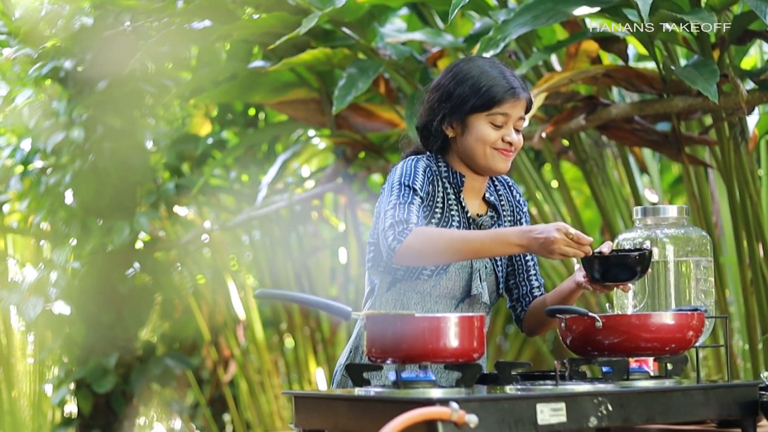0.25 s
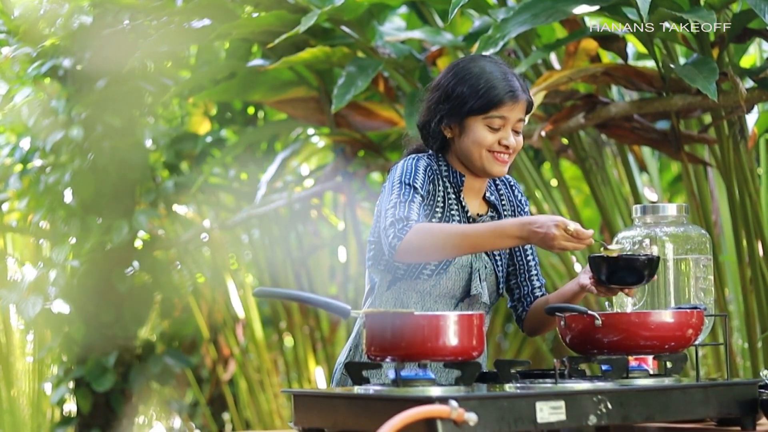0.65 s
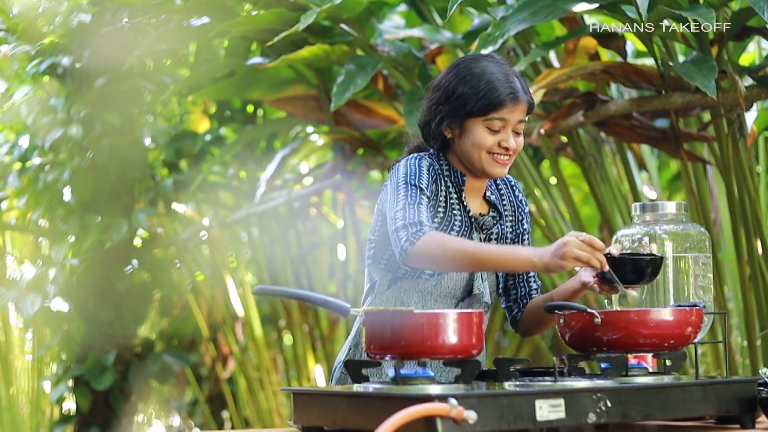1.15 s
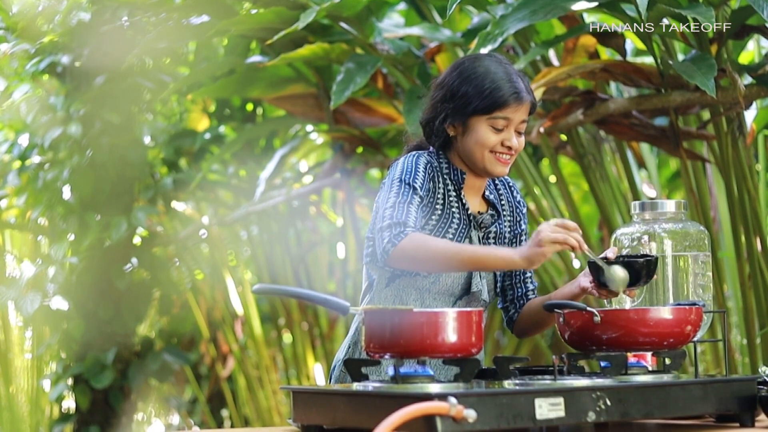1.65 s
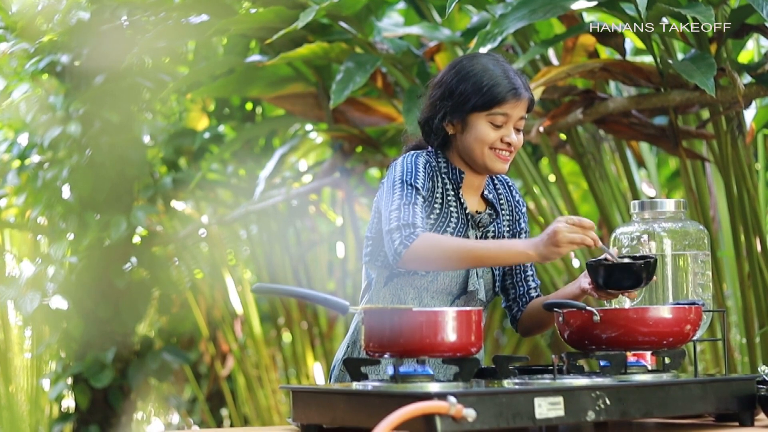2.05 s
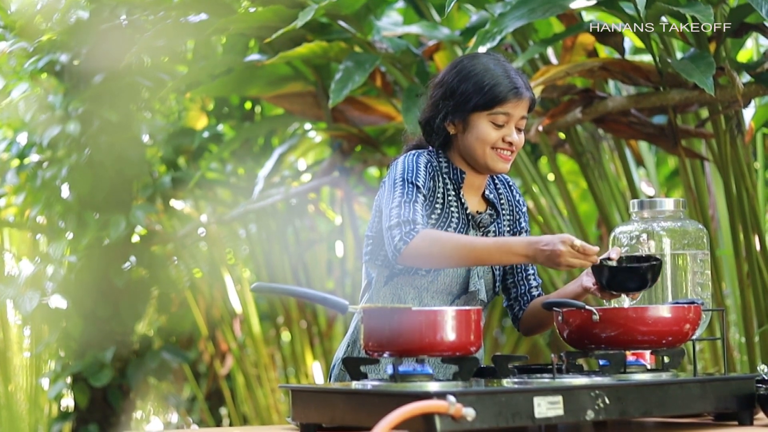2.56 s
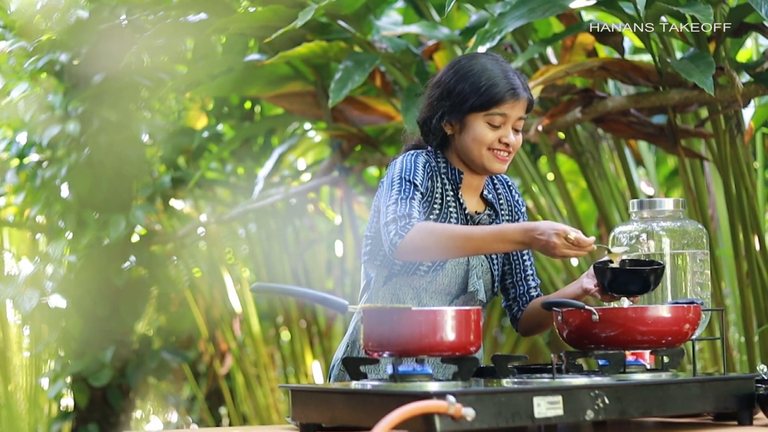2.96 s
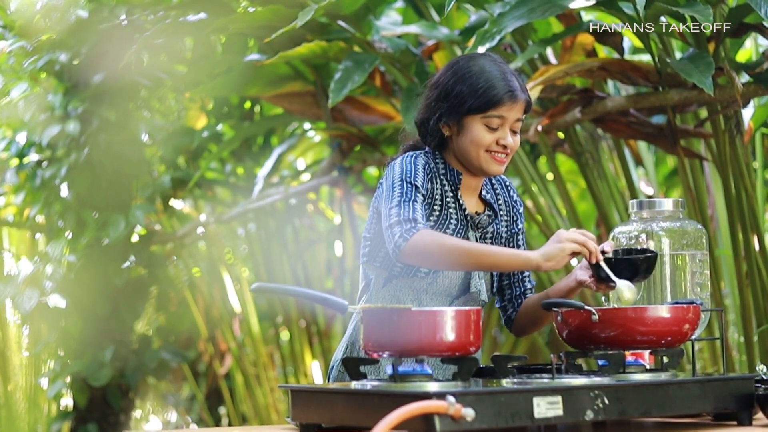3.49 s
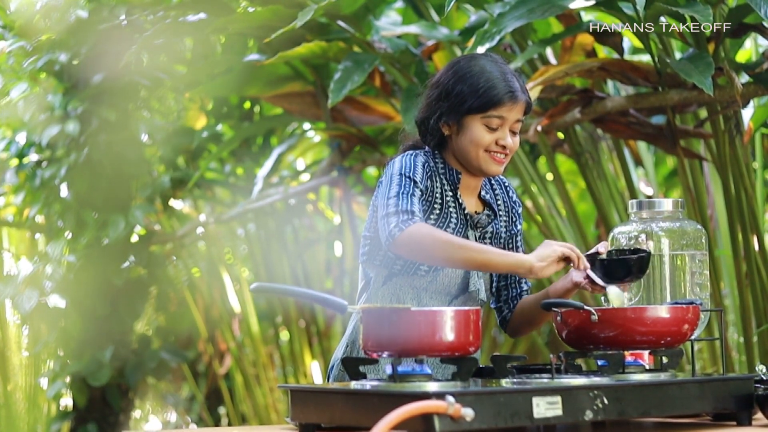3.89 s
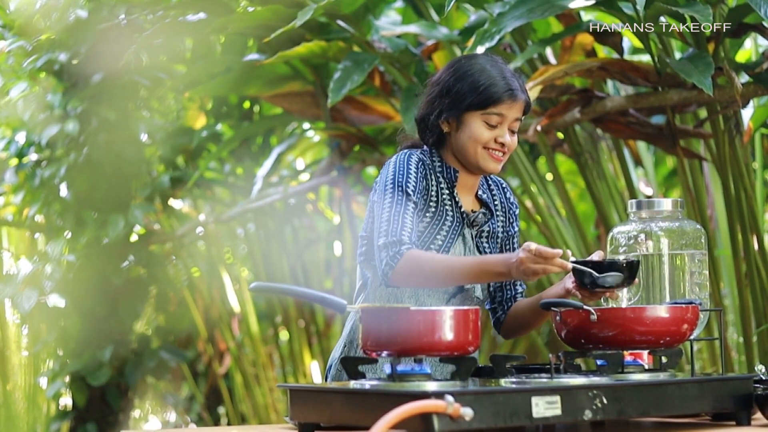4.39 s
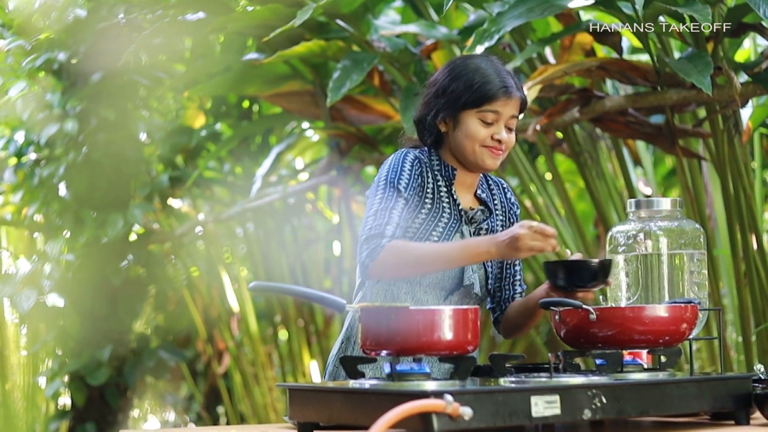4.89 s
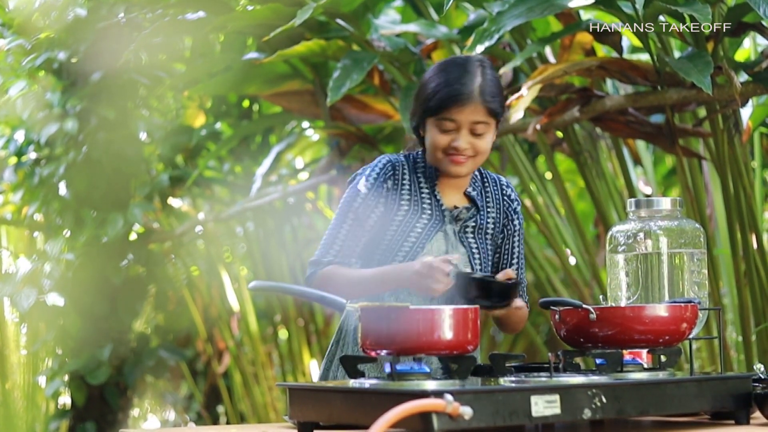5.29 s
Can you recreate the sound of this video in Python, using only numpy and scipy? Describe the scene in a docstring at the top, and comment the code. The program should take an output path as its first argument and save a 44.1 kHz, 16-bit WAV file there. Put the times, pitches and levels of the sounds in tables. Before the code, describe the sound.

Rising bird whistles echo among trees above a pulsing insect buzz, as someone close by knocks a metal spoon against a bowl.

```python
"""An insect already buzzes as we start: rasping noise on a rising tone, about once a second, over soft air.
Close by, a steel spoon knocks a small bowl: cracks of noise and decaying modes; later it bounces and slides,
then rattles. A koel calls three times from plantation trees: gliding sines smeared by echoes from the trunks.
Behind them are banded-noise chirrs, soft low bumps and ticks, sine peeps of distant birds, and shaped noise
for the open air, which alone differs between the two channels."""
import sys
import numpy as np
from scipy import signal
from scipy.fft import rfft, irfft, next_fast_len
from scipy.io import wavfile
from scipy.ndimage import uniform_filter1d

SR = 44100
rng = np.random.default_rng(int(sys.argv[2]) if len(sys.argv) > 2 else 0)


def dump(signal):
    """Clip the signal to [-1, 1] and save it as 16-bit WAV at the path in sys.argv[1]."""
    limited = np.clip(np.atleast_2d(signal).T, -1, 1)
    pcm = np.round(limited * 32767).astype(np.int16)
    wavfile.write(sys.argv[1], SR, pcm)


N = 244269
TIME = np.arange(N) / SR  # s

# Koel in the trees; each whistle: (t/s from the call's start, f/Hz before the call's shift, relative level/dB)
# A level note with a glide at each end
KOEL_FIRST_NOTE = [(0, 1513, -66), (.025, 1772, -51), (.045, 1839, -44.5), (.13, 1852, -38),
                   (.16, 1820, -37), (.2, 1524, -49.5)]
# A higher note that breaks and falls
KOEL_SECOND_NOTE = [(.325, 1600, -59), (.355, 1880, -50), (.38, 2085, -34), (.4, 2075, -38),
                    (.415, 1915, -35.5), (.484, 1880, -39.5), (.514, 1560, -45.5), (.55, 1345, -44)]
# A last downward slur
KOEL_SLUR = [(0.568, 1896, -36), (.585, 1802, -44.5), (.612, 1697, -39), (.642, 1550, -39),
             (0.659, 1494, -60)]
# Each call is higher and louder than the last:
# (start t/s, time stretch/1, pitch shift/semitones, first note level/dB, second note and slur level/dB)
KOEL_CALLS = [(.594, .965, -.45, -4.8, -2), (2.629, 1.0, -.03, -1.8, -1), (4.543, 1.0, .33, 4.2, 4.2)]

# Buzzing phrases of the near insect: (start t/s, length t/s, relative level/dB)
BUZZ_PHRASES = [(-.04, 0.95, -65), (0.959, 0.86, -62.5), (1.979, 0.78, -62.5), (2.977, 0.75, -62),
                (3.989, 0.827, -62.5), (4.962, .88, -60.5)]
# Course of one buzzing phrase: (t/s from its start, f/Hz, relative level/dB)
BUZZ_COURSE = [(0, 6020, -6), (0.059, 6150, -2.5), (0.129, 6260, -2), (0.379, 6215, 0), (0.52, 6340, -1),
               (.95, 6380, -6.5)]

# Ringing modes of the close spoon: (nominal f/Hz, relative level/dB, t60/s at ring length 1)
SPOON_MODES = [(883, -7, .15), (2245, -1, 0.1), (4005, -1.5, 0.085), (6122, -10, 0.15), (8590, -7.5, 0.068),
               (11000, -20, 0.041), (14480, -17, .04)]
# Ringing modes of the close bowl: (nominal f/Hz, relative level/dB, t60/s at ring length 1)
BOWL_MODES = [(685, -9, 0.012), (1186, -9.5, 0.039), (2043, -7.5, 0.044), (2620, -1, 0.036),
              (2770, -9, 0.06), (3373, -11, 0.052), (3870, -16, 0.058), (4145, -15, 0.13),
              (4330, -2.5, 0.036), (4690, -4.5, 0.039), (6640, -9, 0.039), (8440, -16.5, 0.084),
              (9560, -11.5, 0.032), (10520, -8.5, 0.032), (11380, -11.5, 0.042), (13620, -17, 0.033)]
# Spoon meets bowl: (t/s, spoon ring level/dB, bowl ring level/dB, contact crack level/dB,
# f/Hz favoured by the point of contact, ring length/1 as a multiple of t60)
KNOCKS = [(0.211, -38.5, -39.5, -34, 2340, 1.05), (.2632, -48.5, -46.5, -44, 2300, 0.68),
          (.345, -56.5, -56, -61, 2300, .6), (2.329, -41.5, -26.5, -32.5, 4750, 0.73),
          (5.1535, -39, -27.5, -32.5, 4440, 0.69), (5.2007, -27, -21.5, -22.5, 2498, 0.64),
          (5.2838, -40, -45, -39, 4030, 0.81)]
# One bounce: (spoon ring level/dB, bowl ring level/dB, crack level/dB, favoured f/Hz, ring length/1)
BOUNCE = (-32.5, -31.5, -36, 3300, 0.62)
# One rattle touch: (spoon ring level/dB, bowl ring level/dB, crack level/dB, favoured f/Hz, ring length/1)
RATTLE = (-56.5, -55, -59, 4000, 0.5)
# The spoon sliding over the bowl: (t/s, level/dB)
SLIDE = [(5.19, -90), (5.225, -74.5), (5.26, -63), (5.309, -46), (5.37, -61.5), (5.54, -58)]
BOUNCE_GAP_S, BOUNCE_SHRINK = .012, .72  # first gap; each gap as a share of the one before
RATTLE_FROM_S, RATTLE_GAP_S = 5.31, .09
TOUCH_S, TOUCH_DB = 0.99, -37  # a soft touch that rings the spoon's lowest mode; level before the mode's own

# Small dry ticks: (t/s, level/dB, centre f/Hz)
TICKS = [(1.768, -44.5, 1590), (2.074, -46, 1326), (5.051, -36.5, 11750)]
TICK_WIDTH, TICK_CYCLES = 0.88, 41  # band width as a share of the centre; cycles to fall 60 dB

# Thin peeps of distant birds: (start t/s, first f/Hz, level/dB before the echoes)
PEEPS = [(.505, 2164, -61), (.68, 2175, -59), (0.684, 2723, -66), (1.616, 2940, -66.5),
         (1.795, 2969, -65.5)]
PEEP_S, PEEP_FALL = 0.0435, 0.067  # length; share by which the pitch falls

# Two insects further off, each at a steady pace.
# The higher chirr: (first middle t/s, period t/s, length t/s, centre f/Hz, width f/Hz, level/dB)
HIGH_CHIRR = (.32, .72, .28, 10080, 600, -79)
# The other chirr: (first middle t/s, period t/s, length t/s, centre f/Hz, width f/Hz, level/dB)
MIDDLE_CHIRR = (2.97, .985, .5, 6560, 270, -72)
# A lower, occasional chirr: (middle t/s, length t/s, level/dB)
LOW_CHIRRS = [(1.5, .4, -72), (1.84, 0.243, -70), (3.88, .5, -70.5)]
LOW_CHIRR_HZ, LOW_CHIRR_WIDTH_HZ = 3878, 600

# Soft low bumps: (middle t/s, length t/s, level/dB)
BUMPS = [(.027, .025, -48), (.57, .15, -56), (.8, .14, -59), (1.75, .08, -63), (4.96, 0.1226, -56)]
BUMP_HZ, BUMP_WIDTH_HZ = 150, 80

# Spectrum of the open air: (f/Hz, relative level/dB per Hz)
AIR_SPECTRUM = [(20, -28), (45, -4), (100, 0), (270, -5), (560, -5.5), (850, -5.5), (1100, -11),
                (1900, -16), (3200, -21.5), (5500, -26), (7500, -30), (10300, -29.5), (13800, -34)]
AIR_DB, AIR_TOP_HZ = -56.5, 14100
RECORDER_TOP_HZ = 16100


def undb(db):
    """Decibels to gain."""
    return 10 ** (np.asarray(db) / 20)


def unit(x):
    """Scale to rms 1."""
    return x / np.sqrt(np.mean(x ** 2))


def colour(x, points):
    """Shape a spectrum by (f/Hz, level/dB) points, joined along log frequency."""
    hz, db = np.transpose(points)
    f = np.fft.rfftfreq(len(x), 1 / SR)
    gain = undb(np.interp(np.log(np.maximum(f, 1)), np.log(hz), db))
    return irfft(rfft(x) * gain, len(x))


def band_noise(hz, width_hz):
    """Noise in one bell-shaped band, rms 1."""
    size = next_fast_len(N)
    f = np.fft.rfftfreq(size, 1 / SR)
    bell = np.exp(-2 * ((f - hz) / width_hz) ** 2)
    return unit(irfft(rfft(rng.standard_normal(size)) * bell, size)[:N])


def low_pass(x, hz):
    """Steep low-pass."""
    return signal.sosfilt(signal.ellip(8, .2, 70, hz, fs=SR, output="sos"), x)


def walk(rate):
    """Smooth random course, rms 1, with a fresh value rate times a second."""
    k = int(SR / rate)
    steps = np.repeat(rng.standard_normal(N // k + 1), k)
    return unit(uniform_filter1d(steps, k)[:N])


def fade(t, t60):
    """A decay of 60 dB in t60 seconds."""
    return np.exp(-np.log(1000) * t / t60)


def add(out, s, x):
    """Mix x into out from time s."""
    i = int(s * SR)
    out[i:i + len(x)] += x[:max(len(out) - i, 0)]


def swells(rows, hz, width_hz):
    """A band of noise that swells and dies away at each (middle t/s, length t/s, level/dB)."""
    level = np.zeros(N)
    for middle, length, db in rows:
        level += undb(db) * np.cos(np.pi * np.clip((TIME - middle) / length, -.5, .5))
    return level * band_noise(hz, width_hz)


def grove(x, early_db, early_t60, late_db, late_t60):
    """Direct sound, a shower of echoes from nearby trunks, and a diffuse tail from the foliage."""
    t = TIME[:SR]
    hits = rng.random(SR) < 1200 / SR  # 1200 echoes a second on average
    trunks = rng.choice([-1, 1], SR) * hits * fade(t, early_t60) * (t > .008)
    leaves = rng.standard_normal(SR) * fade(t, late_t60) * np.minimum(t / 0.019, 1)
    echo = undb(early_db) * unit(trunks) + undb(late_db) * unit(leaves)
    return x + signal.fftconvolve(x, echo / np.sqrt(SR))[:N]


def koel(waver=0.004115, flutter_db=2.3, overtone_db=-48, gain_db=-2.0):
    """An almost pure whistle glides through two notes and a slur, with slight random pitch and level flutter."""
    out = np.zeros(N)
    tremble = 1 + waver * walk(120)
    flutter = undb(flutter_db * walk(70))
    for start, stretch, semitones, first_db, second_db in KOEL_CALLS:
        age = (TIME - start) / stretch
        parts = ((KOEL_FIRST_NOTE, first_db), (KOEL_SECOND_NOTE, second_db), (KOEL_SLUR, second_db))
        for note, level_db in parts:
            s, hz, db = np.transpose(note)
            hz = hz * 2 ** (semitones / 12)
            pitch = uniform_filter1d(np.interp(age, s, hz), int(0.009 * SR)) * tremble
            sounding = (age > s[0]) * (age < s[-1])
            effort = undb(level_db + np.interp(age, s, db)) * sounding
            effort = uniform_filter1d(effort, int(0.005 * SR))
            phase = 2 * np.pi * np.cumsum(pitch) / SR
            tone = np.sin(phase) + undb(overtone_db) * np.sin(2 * phase)
            whistle = np.sqrt(2) * effort * flutter * tone
            # the bird moves its head, so every whistle meets its own pattern of echoes
            out += grove(whistle, early_db=-0.5, early_t60=0.35, late_db=-7.0, late_t60=1.312)
    return undb(gain_db) * out


def spoon_and_bowl(grain_db=3):
    """Knocks, plus a slide from just before the hardest one: noise of uneven grain, duller than a knock."""
    rubbing = [(200, -8.5), (1200, -0.5), (2300, 2), (3200, -5.5),
               (4100, -2.5), (5200, -11.0), (9000, -25), (14000, -39)]  # (f/Hz, level/dB)
    catches = colour(rng.standard_normal(N) * undb(grain_db * walk(300)), rubbing)
    s, db = np.transpose(SLIDE)
    slide_level = undb(np.interp(TIME, s, db)) * (TIME > s[0])
    return knocks() + slide_level * unit(catches)


def knocks(crack_t60=0.017, tail_db=-25, tail_t60=0.25, firm_db=-33, brightening=0.7):
    """Each knock is a short crack that sets spoon and bowl ringing, with a faint echo from the stove."""
    out, t = np.zeros(N), TIME[:SR // 2]
    contact = [(150, -13), (750, 0), (1450, -9.5), (2450, 6), (3000, -4), (4500, 2.0),
               (5300, -10.0), (6600, -9.5), (11000, -13), (15000, -20)]  # (f/Hz, level/dB)
    for s, spoon_db, bowl_db, crack_db, favoured_hz, free in contacts():
        # a harder blow makes a shorter contact, with more top
        top_db = brightening * max(crack_db - firm_db, 0)
        noise = unit(colour(rng.standard_normal(len(t)), contact))
        crack = colour(noise, [(8000, 0), (15000, top_db)]) * fade(t, crack_t60)
        echo = undb(tail_db) * colour(noise, [(9000, 4.5), (15000, -12)]) * fade(t, tail_t60)
        impact = (crack + echo) * np.minimum(t / 0.001, 1)
        spoon = ring(SPOON_MODES, t, rise_s=0.00062, favoured_hz=favoured_hz, free=free)
        bowl = ring(BOWL_MODES, t, rise_s=0.0011, favoured_hz=favoured_hz, free=free)
        add(out, s, undb(spoon_db) * spoon + undb(bowl_db) * bowl + undb(crack_db) * impact)
    touch = ring(SPOON_MODES[:1], t, rise_s=0.014, favoured_hz=SPOON_MODES[0][0], free=1)
    add(out, TOUCH_S, undb(TOUCH_DB) * touch)
    return out


def contacts(count=6):
    """Every knock, quickening bounces after the hardest one, then a loose rattle."""
    hardest_s = max(KNOCKS, key=lambda knock: knock[2])[0]  # loudest bowl ring
    bounces = hardest_s + np.cumsum(BOUNCE_GAP_S * BOUNCE_SHRINK ** np.arange(count))
    uneven = np.arange(count) + .08 * rng.standard_normal(count)
    rattles = RATTLE_FROM_S + RATTLE_GAP_S * uneven
    return KNOCKS + [(s, *BOUNCE) for s in bounces] + [(s, *RATTLE) for s in rattles]


def ring(modes, t, rise_s, favoured_hz, free, favour_db=4, detune=0.0043):
    """Decaying modes build up over rise_s; the contact point lifts those near one pitch, free scales all t60."""
    hz, db, t60 = np.transpose(modes)[:, :, None]
    hz = hz * (1 + detune * rng.standard_normal(hz.shape))
    db = db + favour_db * np.exp(-(np.log(hz / favoured_hz) / 0.3) ** 2)
    waves = np.sin(2 * np.pi * (hz * t + rng.random(hz.shape)))
    build_up = 1 - np.exp(-t / rise_s)
    return np.sum(undb(db) * fade(t, t60 * free) * waves, axis=0) * build_up


def insect(pulse_hz=50.2, throb=0.39, width_hz=320, skirt_db=-17, skirt_hz=900):
    """A pulsing, rasping noise band rides on a tone that rises through each phrase, echoed by the grove."""
    tones = np.zeros(N)
    s, hz, db = np.transpose(BUZZ_COURSE)
    rasp = band_noise(0, width_hz) + undb(skirt_db) * band_noise(0, skirt_hz)
    rate = pulse_hz * (1 + 0.013 * walk(9))
    pulses = 1 + throb * np.cos(2 * np.pi * np.cumsum(rate) / SR)
    for start, length, level_db in BUZZ_PHRASES:
        age = TIME - start
        gate = np.clip(np.minimum(age / 0.0092, (length - age) / 0.043), 0, 1)
        tone = np.sin(2 * np.pi * np.cumsum(np.interp(age, s, hz)) / SR)
        tones += gate * undb(level_db + np.interp(age, s, db)) * tone
    return grove(tones * rasp * pulses, early_db=2.5, early_t60=0.25, late_db=-4.5, late_t60=1.0)


def ticks():
    """Tiny bursts of banded noise that die at once, the higher the sooner."""
    out, t = np.zeros(N), TIME[:SR // 10]
    attack = 1 - np.exp(-t / .0006)
    for s, db, hz in TICKS:
        burst = band_noise(hz, TICK_WIDTH * hz)[:len(t)]
        add(out, s, undb(db) * attack * fade(t, TICK_CYCLES / hz) * burst)
    return out


def far_birds():
    """Short falling sine whistles, half lost in the foliage."""
    out = np.zeros(N)
    for s, hz, db in PEEPS:
        pitch = hz * np.linspace(1, 1 - PEEP_FALL, int(PEEP_S * SR))
        whistle = np.sqrt(2) * np.sin(2 * np.pi * np.cumsum(pitch) / SR)
        add(out, s, undb(db) * np.hanning(len(pitch)) * whistle)
    return grove(out, early_db=-3.5, early_t60=.3, late_db=-7, late_t60=0.77)


def far_insects():
    """Faint chirrs of swelling noise: two insects keep their own pace, a third joins in now and then."""
    out = swells(LOW_CHIRRS, LOW_CHIRR_HZ, LOW_CHIRR_WIDTH_HZ)
    for first, period, length, hz, width_hz, db in (HIGH_CHIRR, MIDDLE_CHIRR):
        rows = [(middle, length, db) for middle in np.arange(first, N / SR, period)]
        out += swells(rows, hz, width_hz)
    return out


def bumps():
    """Soft low bumps: brief swells of low noise."""
    return swells(BUMPS, BUMP_HZ, BUMP_WIDTH_HZ)


def air(flicker_db=.5, side_db=-28):
    """The open air: flickering shaped noise, nearly alike in both channels, spread most in the treble."""
    mid = unit(colour(rng.standard_normal(N), AIR_SPECTRUM))
    side = unit(colour(rng.standard_normal(N), AIR_SPECTRUM))
    side = colour(side, [(30, 9), (70, -1.5), (300, 0.5), (1000, -11.5), (2500, 7), (10000, 23.5)])
    level = undb(AIR_DB + flicker_db * walk(14))
    spread = undb(side_db) * side * np.array([[1], [-1]])  # opposite sign left and right
    return low_pass(level * (mid + spread), AIR_TOP_HZ)


def scene():
    """All sources sit in the centre of the stereo air."""
    near = koel() + spoon_and_bowl() + insect() + ticks()
    return near + far_birds() + far_insects() + bumps() + air()


def record(dry):
    """The recorder cuts the top."""
    return low_pass(dry, RECORDER_TOP_HZ)


dry = scene()
out = record(dry)
dump(out)
```